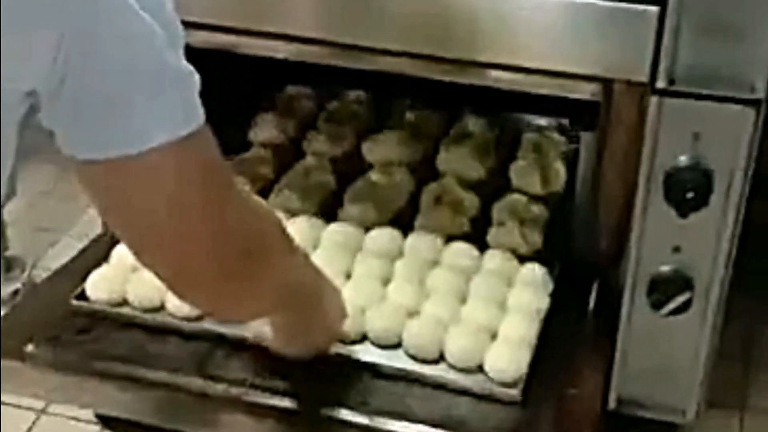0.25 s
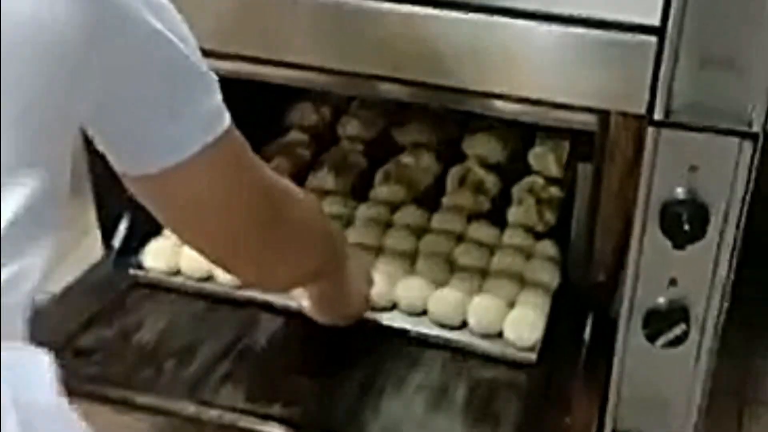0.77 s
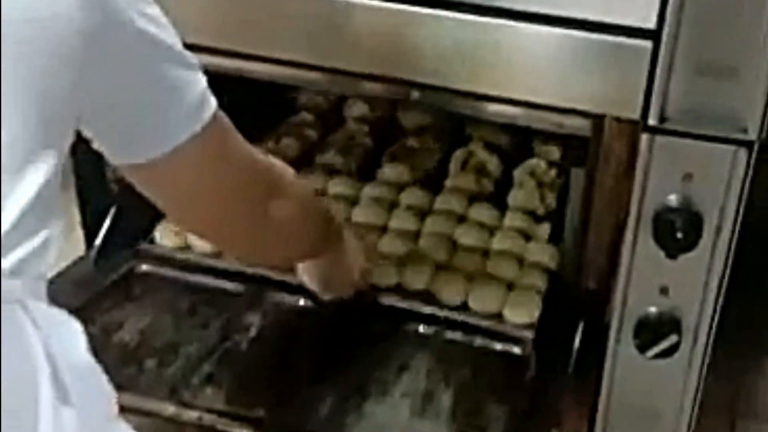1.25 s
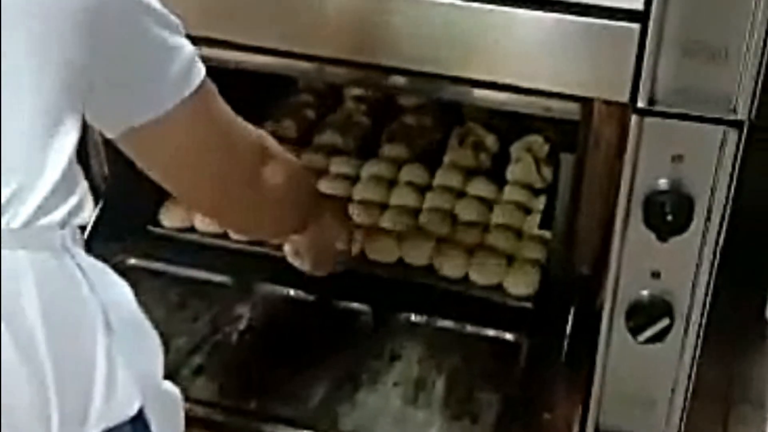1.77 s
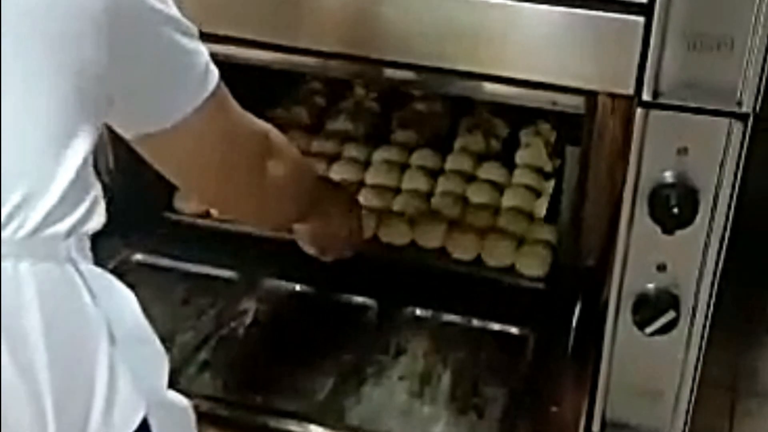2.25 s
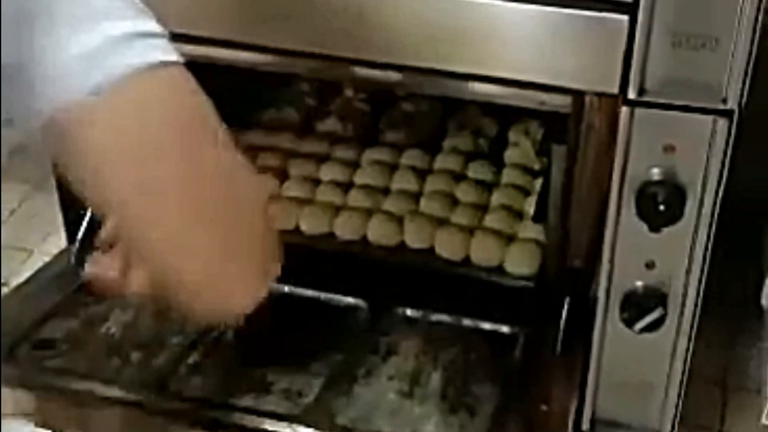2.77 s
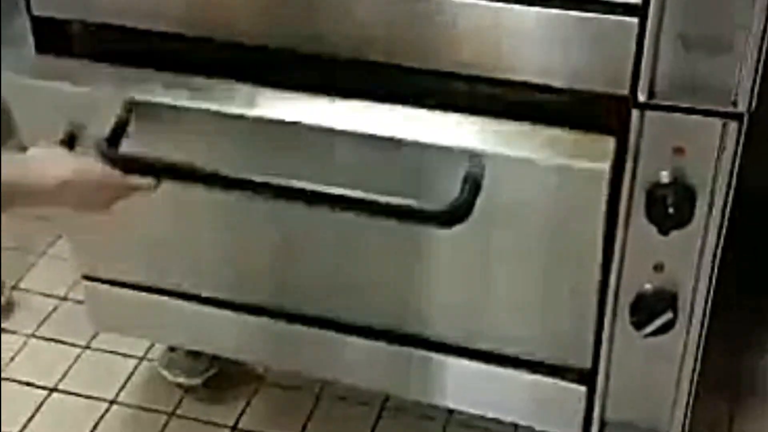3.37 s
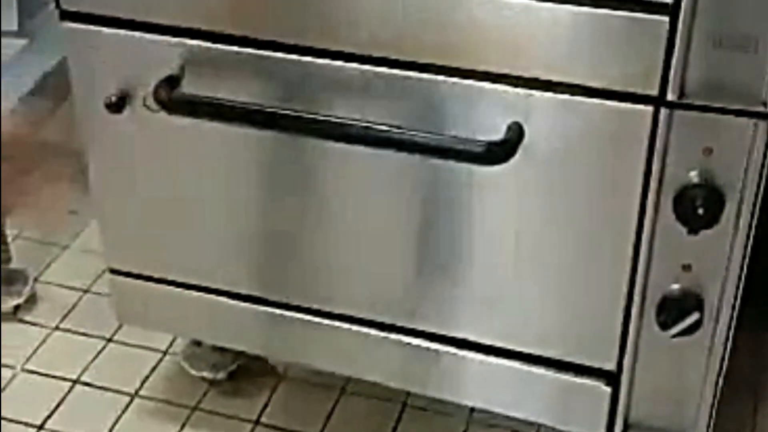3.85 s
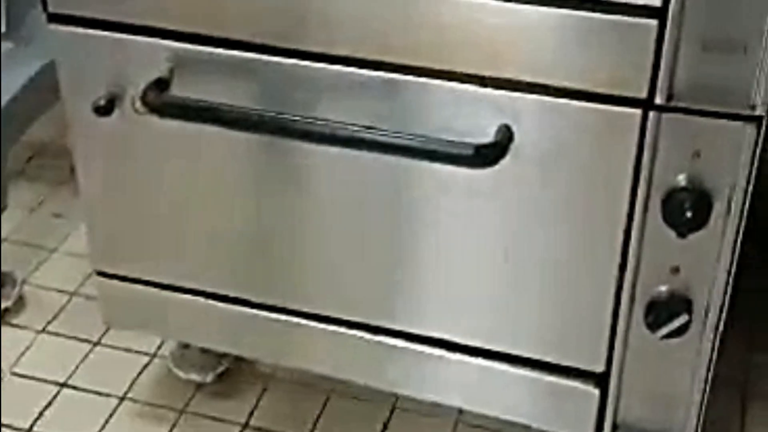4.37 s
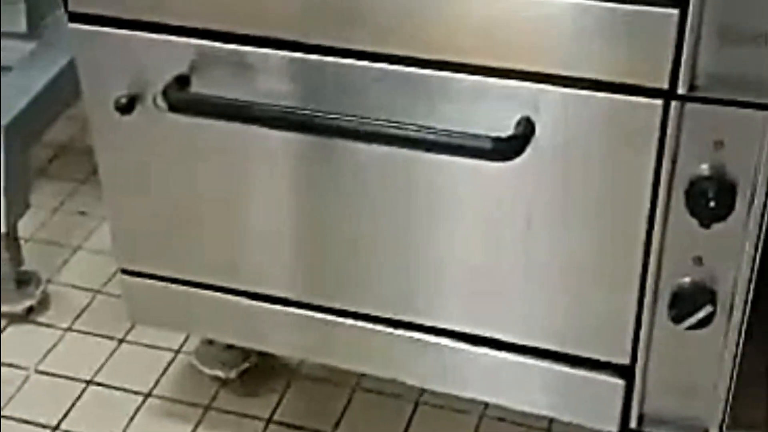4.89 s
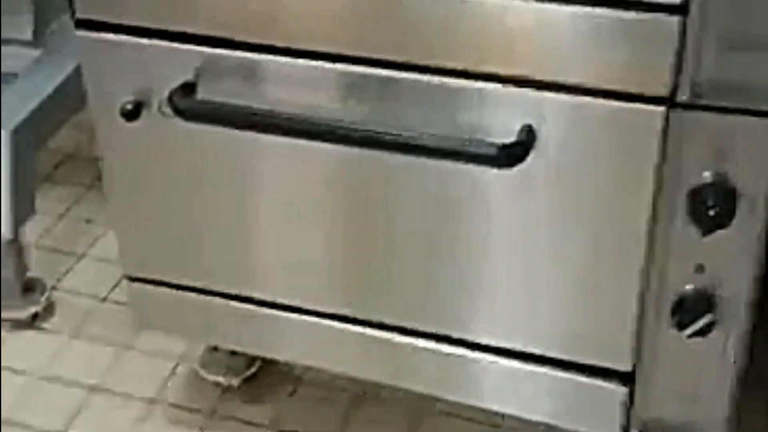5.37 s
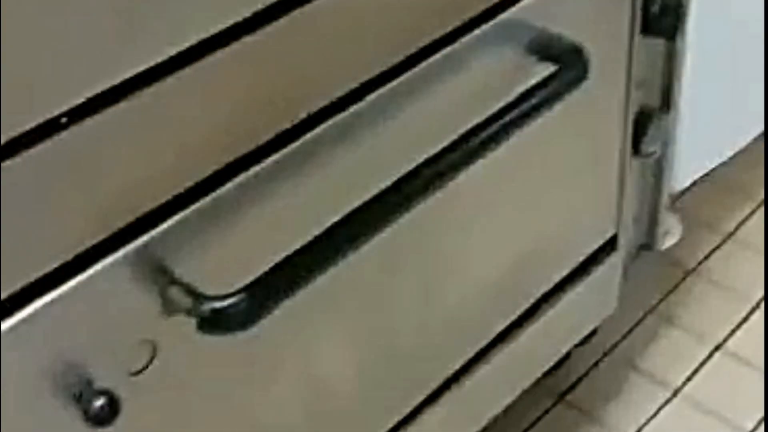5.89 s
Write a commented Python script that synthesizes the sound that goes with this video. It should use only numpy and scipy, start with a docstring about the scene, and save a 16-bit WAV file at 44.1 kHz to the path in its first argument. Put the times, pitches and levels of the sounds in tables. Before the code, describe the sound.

Close, nearly mono pickup in a tiled kitchen: gritty sheet-metal scraping, a sharp clank, another weaker push with small squeaks, then a rattling burst of knocks as the tray settles. One more clack, a pause, then a creaking, groaning oven hinge and a hard slam with short reverberation. Machine rumble and air remain, with muffled thumps and a momentary silence near the end.

```python
"""Tray into a deck oven

A steel tray scrapes and clanks onto an oven rack: contact clicks and impacts drive sheet-metal resonances.
The oven door creaks up by stick-slip in its hinge and slams; a few soft far thumps follow.
Filtered noise and narrow resonances make the rumble, hum and air of a hard-walled kitchen.
Near the end the sound drops out and fades back in; only the treble is slightly wide."""
import sys
import numpy as np
from scipy import signal
from scipy.fft import rfft, irfft
from scipy.io import wavfile
from scipy.ndimage import uniform_filter1d

SR = 44100
rng = np.random.default_rng(int(sys.argv[2]) if len(sys.argv) > 2 else 0)


def makeup_ratio(level_db):
    """Linear amplitude ratio for a level in decibels (20 dB per factor of ten)."""
    decades = np.asarray(level_db, float) / 20
    return 10 ** decades


def persist_wave(psi):
    """Save psi, clipped to +-1, as 16-bit WAV."""
    counts = np.round(np.clip(psi, -1, 1) * 32767).astype(np.int16)
    wavfile.write(sys.argv[1], SR, np.atleast_2d(counts).T)


N = 270333
T = np.arange(N) / SR   # time in seconds
HZ = np.maximum(np.arange(N // 2 + 1) * SR / N, 1)   # frequency of each spectral bin

# Modes of the sheet-steel tray. Each row: frequency in Hz, bandwidth in Hz, relative level in dB.
TRAY_MODES = [(702, 28, 11.5), (867, 34, 11), (1190, 36, 16), (1650, 71, -6.5), (2790, 41, -15.5),
              (3140, 30, -15.5), (4150, 72, -23), (4330, 32, -25), (5590, 170, -7), (6670, 80, -1),
              (6700, 8.2, -15.5)]


def rms_one(x):
    """Normalization: scales a signal to unit rms."""
    return x / np.sqrt(np.mean(x ** 2) + 1e-20)


def at_hz(points, hz):
    """Linear interpolation of a curve on a logarithmic frequency axis."""
    curve_hz, value = np.array(points).T[:2]
    return np.interp(np.log(hz), np.log(curve_hz), value)


def coloured(x, spectrum):
    """Spectral shaping: weights the bins of a white signal, with nothing outside the curve; rms 1."""
    inside = (HZ > spectrum[0][0]) & (HZ < spectrum[-1][0])
    return rms_one(irfft(rfft(x) * makeup_ratio(at_hz(spectrum, HZ)) * inside, N))


def band(x, low_hz, high_hz):
    """Band-pass filtering by a Butterworth filter."""
    sos = signal.butter(2, [low_hz, min(high_hz, SR / 2.2)], "band", fs=SR, output="sos")
    return signal.sosfilt(sos, x)


def resonance(x, hz, width_hz):
    """Damped oscillator: a two-pole resonance with about unit gain at its peak."""
    r = np.exp(-np.pi * width_hz / SR)
    poles = [1, -2 * r * np.cos(2 * np.pi * hz / SR), r * r]
    return signal.lfilter([(1 - r * r) / 2, 0, (r * r - 1) / 2], poles, x)


def sharp_resonance(x, hz, width_hz):
    """Cascaded oscillators: two equal resonances in series give steeper skirts; rms 1."""
    return rms_one(resonance(resonance(x, hz, width_hz), hz, width_hz))


def dying(clicks, t60):
    """Exponential decay: each click starts an envelope that falls 60 dB in t60 seconds."""
    return signal.lfilter([1], [1, -makeup_ratio(-60 / (t60 * SR))], clicks + 1e-18)


def impulses(seconds, sizes):
    """Impulse train: one sample of the given size at each time."""
    out = np.zeros(N)
    out[np.round(np.array(seconds) * SR).astype(int)] = sizes
    return out


def drift(rate):
    """Low-pass random process: noise through two poles at rate Hz; rms 1."""
    r = np.exp(-80 * np.pi * rate / SR)   # computed at every 40th sample
    noise = rng.standard_normal(N // 40 + 2002)
    slow = signal.lfilter([1], [1, -2 * r, r * r], noise)[2000:]
    return np.interp(np.arange(N) / 40, np.arange(len(slow)), rms_one(slow))


def grit(per_s, spread_db):
    """Poisson-like contact: random clicks of uneven size and sign; rms 1."""
    sizes = makeup_ratio(spread_db * np.minimum(rng.exponential(1, N), 4)) * rng.choice([-1, 1], N)
    return rms_one(sizes * (rng.random(N) < per_s / SR))


def body(excitation, modes, shift_db):
    """Modal superposition: parallel resonances whose levels wander independently; rms 1."""
    out = np.zeros(N)
    for k, (hz, width_hz, db) in enumerate(modes):
        level_db = db + shift_db * drift(9.0).clip(-3, 1.5)
        out += (-1) ** k * makeup_ratio(level_db) * resonance(excitation, hz, width_hz)
    return rms_one(out)


def streaked(x, width_share, shift_db, rate):
    """High modal density: 44 close resonances, each swelling and fading on its own."""
    pitches = np.geomspace(450, 12500, 44) * rng.uniform(.97, 1.03, 44)
    return sum(makeup_ratio(shift_db * drift(rate).clip(-3, 1.5)) * resonance(x, hz, width_share * hz)
               for hz in pitches)


def oven_ring(contact, width_hz, even_share):
    """Mode locking: under friction the oven's strongest resonance wavers less than noise would; rms 1."""
    ring = sharp_resonance(contact, 1268, width_hz)
    power = uniform_filter1d(ring ** 2, size=300).clip(0)
    return rms_one(ring / (power + .05) ** (even_share / 2))


def blows(rows, modes, colour, ring_db, crack_db, rattle_db, rattle_t60, thud_hz, thud_t60):
    """Impact response: a crack, a dense rattle, a low thud and a reverberant tail decaying by band."""
    # Room reverberation. Each row: frequency in Hz, 60 dB decay time in seconds.
    room_t60 = [(100, 0.99), (500, 0.73), (2000, 0.62), (6000, 0.5), (9000, 0.31)]
    fill_t60 = .03   # s; the room takes some ms to fill
    s, click_db, thud_db, tilt, room_db = np.transpose(rows)
    white = rng.standard_normal(N)
    dense = coloured(white, colour)
    streaks = streaked(dense, width_share=.015, shift_db=3.5, rate=12)
    dense = dense + makeup_ratio(2.5) * streaks + makeup_ratio(ring_db) * body(white, modes, shift_db=4.0)
    dense = dense * makeup_ratio(0.89 * drift(61))   # loose parts rattle unevenly

    out = np.zeros(N)
    edges = 400 * 2 ** np.arange(0, 5.6, .75)   # Hz, three-quarter octaves
    for k, (low_hz, high_hz) in enumerate(zip(edges, edges[1:])):
        sizes = makeup_ratio(click_db + tilt * np.log2(low_hz / 1500))
        clicks, wet = impulses(s, sizes), impulses(s, sizes * makeup_ratio(room_db))
        tail = dying(wet, at_hz(room_t60, low_hz)) - dying(wet, fill_t60)
        direct = makeup_ratio(crack_db) * dying(clicks, 0.011) + makeup_ratio(rattle_db) * dying(clicks, rattle_t60)
        out += (-1) ** k * band(dense, low_hz, high_hz) * (direct + tail)

    knocks = impulses(s, makeup_ratio(thud_db))
    swell = dying(knocks, thud_t60) - dying(knocks, 0.042)
    noise = rng.standard_normal(N)
    upper = band(noise, thud_hz / 1.28, thud_hz * 2.09)
    lower = band(noise[::-1], 55, thud_hz / 1.48)   # reversed noise is unrelated to the upper band
    return out + swell * rms_one(upper + makeup_ratio(-4.0) * lower)


def tones(rows, overtone_db):
    """Regular stick-slip: brief wavering, fluttering tones with harmonics and a faint tail."""
    out = np.zeros(N)
    waver, flutter = 1 + 0.006 * drift(40), makeup_ratio(3.3 * drift(98))
    for s, length, hz, db in rows:
        phase = 2 * np.pi * hz * np.cumsum(waver) / SR
        done = np.clip((T - s) / length, 0, 1)
        tail = makeup_ratio(-5.5) * done * np.exp(-(T - s).clip(0) / 0.045)
        harmonics = sum(makeup_ratio(overtone_db * k) * np.sin((k + 1) * phase) for k in range(5))
        out += makeup_ratio(db) * (np.sin(np.pi * done) + tail) * harmonics
    return out * flutter


def staged(levels_db):
    """Piecewise-constant level: oven open, oven shut, after the dropout; blended over 0.2 s."""
    # Times in seconds at which the second and third stage begin.
    stage_starts = [3.79, 5.6]
    levels = np.array(levels_db, float)[np.searchsorted(stage_starts, T)]
    return uniform_filter1d(levels, size=SR // 5)


def kitchen():
    """Broadband and tonal noise: machine rumble with wandering hums, patchy ventilation air, whines."""
    # Rumble and air spectra. Each row: frequency in Hz, relative density in dB per Hz.
    rumble_colour = [(13, -20.5), (22, -15.5), (87, 2), (225, 2), (264, 2), (356, -18.5), (411, -25),
                     (500, -75), (650, -37), (1100, -120)]
    air_colour = [(300, 2), (420, -1.5), (600, -4), (950, -6.5), (1280, -6.5), (1600, -10.5), (2400, -16.5),
                  (4000, -18.5), (5300, -22.5), (7000, -25.5), (8500, -27), (11000, -25), (13100, -32)]
    # Machine hums. Each row: frequency in Hz, bandwidth in Hz, relative level in dB.
    hum_modes = [(49, 13, -2.5), (97.4, 10.4, 4), (140, 10.6, -2), (217.6, 15.2, -0.5), (260.4, 16, -5),
                 (325.8, 38, -8.5), (410.6, 18.4, -8)]
    # Whines. Each row: frequency in Hz, bandwidth of each pass in Hz, level against the air in dB
    # before the stage offset.
    whine_modes = [(674.3, 22, -13.5), (1262.6, 80, -4.5), (5835, 92, -20), (6800, 60, -25.5),
                   (6860, 54, -36.5)]
    # Swells of the rumble. Each row: centre in seconds, rise in dB.
    swells = [(.12, 6.5), (3.2, 7), (3.95, 5), (4.63, 3), (5.87, 2.5)]
    # Offsets in dB of the whines above and below 3 kHz, one for each stage.
    high_offsets = [-6, 0, -7]
    low_offsets = [.5, .5, 2.5]

    white = rng.standard_normal((3, N))
    rumble_db = staged([-34, -34.5, -34.5])
    rumble_db = rumble_db + sum(db * np.exp(-((T - s) / 0.12) ** 2) for s, db in swells)
    hums = body(white[2], hum_modes, shift_db=6.5)
    rumble = rms_one(coloured(white[0], rumble_colour) + makeup_ratio(4.0) * hums) * makeup_ratio(rumble_db)

    air_db = staged([-40, -39, -37.5]) + 1.3 * drift(1.0)
    hiss_db = staged([2.5, -4, -9]) + .8 * drift(1.5)   # treble of the air against its lower part
    air = coloured(white[1], air_colour)
    air = rms_one(air + makeup_ratio(-1.0) * streaked(air, width_share=0.022, shift_db=6.5, rate=3.2))
    low = signal.filtfilt(*signal.butter(2, 3000, fs=SR), air)

    low_db, high_db = staged(low_offsets), staged(high_offsets)
    whines = np.zeros(N)
    for hz, width_hz, db in whine_modes:
        stage_db, spread_db = (high_db, 3.2) if hz > 3000 else (low_db, 1.3)
        level_db = db + stage_db + spread_db * drift(7.5)
        whines += makeup_ratio(level_db) * sharp_resonance(white[2], hz, width_hz)
    return rumble + makeup_ratio(air_db) * (low + makeup_ratio(hiss_db) * (air - low) + whines)


def slide():
    """Sliding friction: dense grit under the tray drives its resonances and a broad rasp."""
    # Rasp spectrum. Each row: frequency in Hz, relative density in dB per Hz.
    rasp_colour = [(120, -15.5), (250, -9.5), (600, -15), (1000, -8.5), (1270, -3), (1600, -3.5),
                   (2400, -6.5), (3400, -4.5), (5500, -15), (7200, -22), (13100, -28)]
    # Pushes of the tray over steel. Each row: time of full speed in seconds, run-up in seconds,
    # time held in seconds, level in dB, treble against that level in dB.
    pushes = [(0.0, .05, .36, -20, -3.5), (.78, 0.3, 0.25, -28, -6.5), (1.17, 0.016, 0.058, -46.5, 5),
              (1.33, 0.033, 0.36, -33.5, 3)]
    contact = grit(per_s=7000, spread_db=2.1) * makeup_ratio(1.15 * drift(30))
    rasp = coloured(contact, rasp_colour)
    streaks = streaked(rasp, width_share=0.0099, shift_db=7.0, rate=11)
    rasp = rasp + makeup_ratio(1) * streaks + makeup_ratio(-1.5) * body(contact, TRAY_MODES, shift_db=6.5)
    rasp = rasp + makeup_ratio(-3.0) * oven_ring(contact, width_hz=82, even_share=.4)
    low = signal.filtfilt(*signal.butter(1, 2500, fs=SR), rasp)
    low, high = rms_one(low), rms_one(rasp - low)

    out = np.zeros(N)
    run_up_db, sag_db_per_s, stop_db_per_s = 15, 21, 118.5   # a push swells, slows down, then stops
    for s, run_up, held, db, treble_db in pushes:
        lost_db = run_up_db * (s - T).clip(0) / run_up
        lost_db = lost_db + sag_db_per_s * (T - s).clip(0) + stop_db_per_s * (T - s - held).clip(0)
        out += makeup_ratio(db - lost_db) * (low + makeup_ratio(treble_db) * high)
    return out


def tray_knocks():
    """Impact excitation of plate modes: the tray clanks against steel."""
    # Each row: time in seconds, click level in dB, thud level in dB, spectral tilt in dB per octave
    # about 1500 Hz, room against click in dB.
    knocks = [(0.188, -4, -16.5, 4.5, -17.5), (0.313, -29, -73, 4, -7.5), (0.742, -34, -27, 3.5, -13),
              (1.163, -33, -53, 8.7, -18), (1.31, -27, -29.5, 10, -22), (1.361, -20, -31, -2.5, -17),
              (1.41, -18, -24, 0, -13.5), (1.457, -8.5, -37, 4.5, -11.5), (1.5, -3, -13.5, 8, -28),
              (2.271, -28, -22.5, 4.5, -20), (2.281, -13.5, -16, 3.5, -21)]
    # Knock spectrum. Each row: frequency in Hz, relative density in dB per Hz.
    knock_colour = [(400, 1), (800, 0), (1250, 5), (2000, -6), (3300, -9), (5000, -16.5), (7000, -25),
                    (11000, -27.5), (13100, -41.5), (15500, -40)]
    return blows(knocks, TRAY_MODES, knock_colour, ring_db=-8.0, crack_db=-30.0,
                 rattle_db=-9.5, rattle_t60=0.11, thud_hz=145, thud_t60=0.33)


def singing_modes():
    """Friction-excited modes: single modes of tray and hinge sing out almost as pure tones."""
    # Each row: start in seconds, length in seconds, pitch in Hz, level in dB.
    songs = [(0.73, 0.056, 1555, -30.5), (0.738, 0.047, 1180, -29), (.745, 0.15, 3340, -34.5),
             (0.748, 0.021, 4330, -37), (0.813, 0.077, 2040, -30.5), (.86, 0.18, 3380, -42),
             (0.91, 0.12, 1600, -39), (1.163, 0.091, 3090, -40), (1.168, 0.086, 5590, -42.5),
             (1.176, 0.076, 2670, -46), (2.313, 0.048, 2500, -39), (2.976, 0.015, 1190, -26.5),
             (3.116, 0.035, 7100, -35), (3.15, 0.021, 2790, -21.5), (3.165, 0.017, 5700, -34.5),
             (3.185, 0.021, 2790, -19.5), (3.2, 0.017, 5540, -32), (3.247, 0.056, 2850, -28),
             (3.45, 0.054, 2880, -34), (3.485, 0.094, 2550, -29.5), (3.728, 0.027, 3500, -40),
             (4.571, 0.052, 2300, -42.5)]
    return tones(songs, overtone_db=-29.5)


def hinge():
    """Irregular stick-slip: hinge slips groan in one strong mode, rub broadly and shake the door panel."""
    # Door swinging up. Each row: time in seconds, friction level in dB.
    swing = [(2.95, -61), (3.04, -35.5), (3.12, -24), (3.146, -20), (3.19, -14.5), (3.3, -14),
             (3.42, -22.5), (3.55, -34), (3.63, -40.5), (3.67, -38.5), (3.78, -39.5)]
    # Rub spectrum. Each row: frequency in Hz, relative density in dB per Hz.
    rub_colour = [(400, -5.5), (800, 1), (1250, 8), (1700, -2.5), (2800, -7), (4500, -12), (7000, -19.5),
                  (10000, -23.5), (13100, -28.5)]
    # Hinge modes. Each row: frequency in Hz, bandwidth in Hz, relative level in dB.
    hinge_modes = [(503, 28, -10), (1257, 100, -1), (1840, 33, -24), (2790, 79, -34), (3380, 720, -16),
                   (4300, 127, -32), (5410, 220, -23.5), (6470, 35, -37)]
    # Sudden slips. Each row: time in seconds, surge in dB before its swell is shaped.
    jerks = [(3.134, 13), (3.163, 6.5), (3.212, 11), (3.243, 6), (3.27, 2.5), (3.325, 3), (3.435, 13)]
    # Shudders of the door panel. Each row: time in seconds, level in dB before the swell is shaped.
    shudders = [(3.029, -34), (3.17, -13.5), (3.279, -10)]

    swing_s, swing_db = np.transpose(swing)
    friction_db = np.interp(T, swing_s, swing_db, left=-120, right=-120)
    moving = friction_db > -100
    groan_db = -18.5 + 1.06 * (friction_db + 23.5)   # level at -23.5 dB of friction; dB per dB
    boom_db = -29.5 + 0.71 * (friction_db + 23.5)
    shudder_s, shudder_db = np.transpose(shudders)
    shoves = impulses(shudder_s, makeup_ratio(shudder_db))
    shudder = dying(shoves, 0.39) - dying(shoves, 0.031)
    jerk_s, jerk_db = np.transpose(jerks)
    surges = impulses(jerk_s, jerk_db)
    jerk = makeup_ratio(dying(surges, 0.12) - dying(surges, .012))   # swells within ms and sinks back

    slips = grit(per_s=3000, spread_db=0.5)
    groan = jerk * oven_ring(slips, width_hz=117, even_share=.6)
    rub = coloured(slips, rub_colour)
    streaks = streaked(rub, width_share=0.0092, shift_db=6.0, rate=22)
    rub = rms_one(rub + makeup_ratio(2.0) * streaks + makeup_ratio(-5) * body(slips, hinge_modes, shift_db=6.5))
    squeal = sum(makeup_ratio(db + 2.5 * drift(12)) * sharp_resonance(slips, hz, 71)
                 for hz, db in [(2790, -21), (3450, -22.5)])
    rub = rub + squeal * (groan_db > -24)   # squeals only while the groan is strong
    rub = makeup_ratio(friction_db + 4.5 + 1.1 * drift(35)) * jerk ** 0.34 * rub
    boom = rms_one(resonance(slips, 235, 35) + makeup_ratio(-10.5) * band(slips, 120, 380))
    return makeup_ratio(groan_db) * groan + rub + (makeup_ratio(boom_db) * moving + shudder) * boom


def hinge_squeak():
    """Harmonic stick-slip: the hinge breaks loose with a squeak rich in overtones."""
    # Each row: start in seconds, length in seconds, pitch in Hz, level in dB.
    squeak = [(3.011, 0.021, 2370, -25)]
    return tones(squeak, overtone_db=-6.5)


def door_slam():
    """Impact excitation of a damped panel: the oven door slams shut."""
    # Each row: time in seconds, click level in dB, thud level in dB, spectral tilt in dB per octave
    # about 1500 Hz, room against click in dB.
    slam = [(3.79, -3.5, -12.5, 2.5, -8.5)]
    # Door modes. Each row: frequency in Hz, bandwidth in Hz, relative level in dB.
    door_modes = [(874, 28, 22.5), (1093, 41, 13), (1167, 28, 14), (2170, 150, 17), (2500, 21, -25.5),
                  (3050, 32, -13.5), (3380, 84, -2.5), (4400, 150, 20.5), (5300, 28, -8), (6000, 150, -3),
                  (7070, 37, -1.5)]
    # Slam spectrum. Each row: frequency in Hz, relative density in dB per Hz.
    slam_colour = [(400, -7), (800, 6), (1250, 6), (2000, 0), (3300, -5.5), (5000, -11), (7000, -14.5),
                   (9000, -16), (12000, -11), (13100, -28.5), (15500, -30.5)]
    return blows(slam, door_modes, slam_colour, ring_db=-12, crack_db=-2,
                 rattle_db=-17.0, rattle_t60=0.017, thud_hz=175.5, thud_t60=0.47)


def thumps():
    """Damped free oscillation: soft far bumps, a few cycles each."""
    # Each row: start in seconds, level in dB before the envelope, pitch in Hz.
    bumps = [(4.403, -25, 94.5), (4.643, -16, 140), (4.667, -20.5, 132), (4.788, -21, 86.5),
             (4.849, -23.5, 408), (5.001, -17.5, 182), (5.038, -20.5, 119), (5.138, -23, 234),
             (5.276, -28, 96), (5.88, -24, 352.7)]
    out = np.zeros(N)
    for s, db, hz in bumps:
        age = (T - s).clip(0)
        envelope = np.exp(-age / 0.02) * (1 - np.exp(-age / 0.0014))
        out += makeup_ratio(db) * np.sin(2 * np.pi * hz * age) * envelope
    return out


def scene():
    """Linear superposition of all sources, the same in both channels."""
    mono = kitchen() + slide() + tray_knocks() + singing_modes()
    mono = mono + hinge() + hinge_squeak() + door_slam() + thumps()
    return np.array([mono, mono])


def automatic_gain(x):
    """Dynamic compression: loud passages pull the gain down and it creeps back."""
    above_db, share, back_db_per_s = -21.5, 0.25, 4.5
    level_db = 10 * np.log10(uniform_filter1d(x ** 2, size=2000).clip(1e-12))
    over_db = (level_db - above_db).clip(0) * share
    held_db = np.maximum.accumulate(over_db + back_db_per_s * T) - back_db_per_s * T
    return x * makeup_ratio(-uniform_filter1d(held_db, size=4000, origin=1999))   # eases in over 4000 samples


def band_limit(x):
    """A steep low-pass at the top of the band."""
    return signal.sosfilt(signal.butter(12, 13170, fs=SR, output="sos"), x)


def record(dry):
    """Gain control, a treble step, saturation and a dropout; decorrelation widens the treble throughout."""
    ends = np.minimum(1, np.minimum(T, T[::-1]) / .002)   # 2 ms fades
    step_db = np.interp(HZ, [7400, 7700, 9200], [0, -14, -11.5])
    mid = irfft(rfft(automatic_gain(dry[0]) * ends) * makeup_ratio(step_db), N)
    mid = 1.147 * np.tanh(mid / 1.373)   # rounds the peaks

    dropout_s, return_s, fade_s = 5.553, 5.645, 0.26
    mid = mid * np.where(T < dropout_s, 1, ((T - return_s) / fade_s).clip(0, 1))

    smear = rms_one(rng.standard_normal(6000) * np.exp(-np.arange(6000) / 2500)) / 77   # about unit energy
    treble = signal.sosfilt(signal.cheby2(20, 90, 3830, "high", fs=SR, output="sos"), mid)
    sounding = (T < dropout_s) | (T > return_s)
    side = makeup_ratio(-10) * signal.fftconvolve(treble, smear)[:N] * sounding
    return band_limit(np.array([mid + side, mid - side]))


dry = scene()
out = record(dry)
persist_wave(out)
```